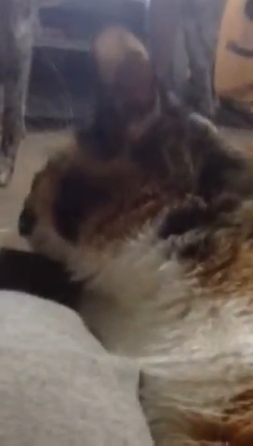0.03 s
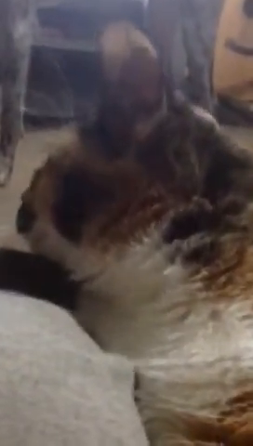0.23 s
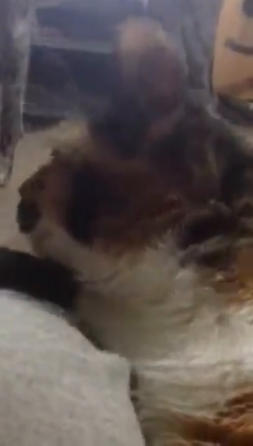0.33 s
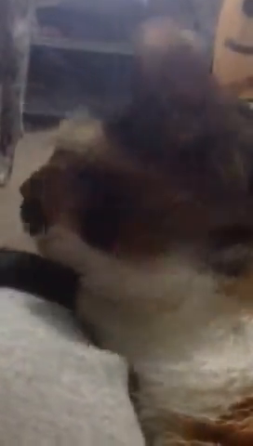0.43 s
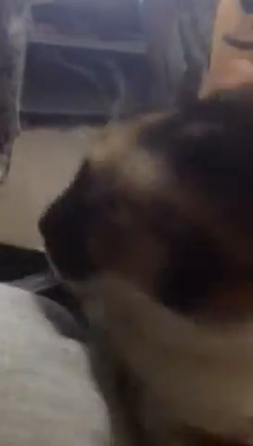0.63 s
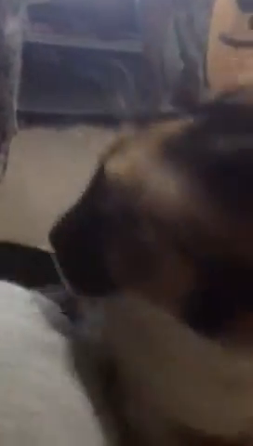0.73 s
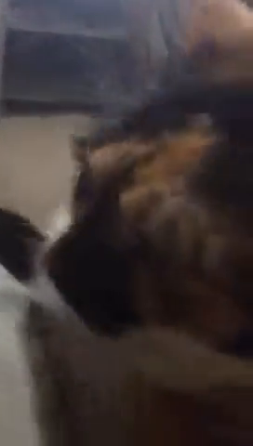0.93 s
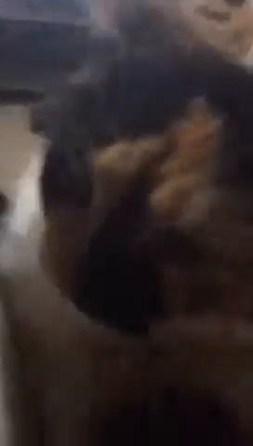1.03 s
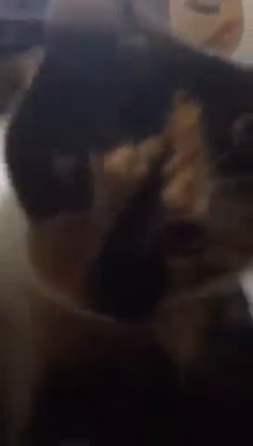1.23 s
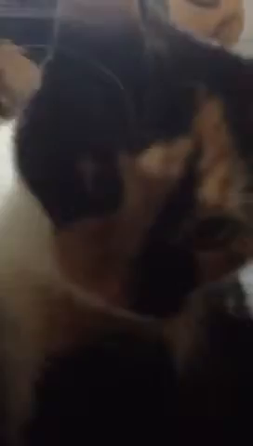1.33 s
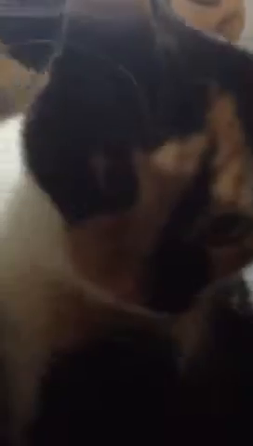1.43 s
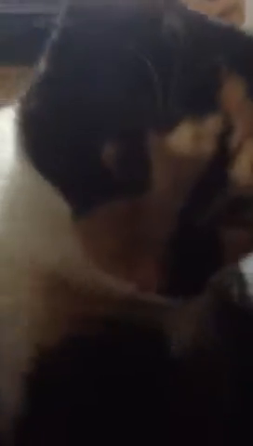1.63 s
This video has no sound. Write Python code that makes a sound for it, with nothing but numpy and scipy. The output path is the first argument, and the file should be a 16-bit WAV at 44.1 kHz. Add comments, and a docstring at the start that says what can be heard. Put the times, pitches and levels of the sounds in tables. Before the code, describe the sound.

A cat growls once, low and close to the microphone. The growl starts as a slow, uneven rattle, tightens into a louder, raspy buzz and ends in a short hum, over the faint hiss of a quiet room.

```python
"""Close cat growl.

A cat gives one long, low growl in a quiet, hissy room. Its vocal folds start as a slow uneven rattle,
speed up to a steadier buzz, slip into strong-weak pairs and end in a short closed-mouth hum.
The pulses ring the throat and mouth; puffs of air sound the nose and hiss faintly through the teeth."""
import sys
import numpy as np
from scipy import signal
from scipy.fft import rfft, irfft
from scipy.io import wavfile

SR = 44100
rng = np.random.default_rng(int(sys.argv[2]) if len(sys.argv) > 2 else 0)


def master_out(mix):
    """Clip the mix to full scale and print it as 16-bit PCM to the path in sys.argv[1]."""
    frames = np.transpose(np.atleast_2d(mix))
    ceiling = np.clip(frames, -1, 1)
    pcm = np.round(ceiling * 32767).astype(np.int16)
    wavfile.write(sys.argv[1], SR, pcm)


N = 74970
TIME_S = np.arange(N) / SR
HIGH_CUT_HZ = 15340


def amp(db):
    """Decibels to gain."""
    return 10 ** (np.asarray(db) / 20)


def curve(table, column=1):
    """One column of a time table, at every sample."""
    rows = np.array(table)
    return np.interp(TIME_S, rows[:, 0], rows[:, column])


def unit(x):
    """Scale to rms 1."""
    return x / np.sqrt(np.mean(x ** 2) + 1e-20)


def steady(x):
    """Scale to a running rms of 1."""
    window = np.hanning(2600)
    power = abs(signal.fftconvolve(x ** 2, window / window.sum(), "same"))
    return x / np.sqrt(power + 1e-14)


def jump(clicks):
    """Turn each click into a dip followed by a peak."""
    return signal.hilbert(clicks).imag


def colour(x, outline, causal=True):
    """Filter by a (freq_hz, gain_db) outline, causal or zero-phase."""
    hz, db = np.transpose(outline)
    bin_hz = abs(np.fft.fftfreq(N, 1 / SR)) + 1
    log_gain = np.log(amp(np.interp(np.log(bin_hz), np.log(hz), db)))
    if causal:
        log_gain = np.conj(signal.hilbert(log_gain))
    return np.fft.ifft(np.fft.fft(x) * np.exp(log_gain)).real


def band(x, low_hz, high_hz, order=10):
    """Zero-phase band-pass."""
    hz = np.fft.rfftfreq(N, 1 / SR) + 1e-3
    power_loss = (1 + (low_hz / hz) ** order) * (1 + (hz / high_hz) ** order)
    return irfft(rfft(x) / np.sqrt(power_loss), N)


def resonate(x, hz, width_hz):
    """Resonance at a constant or moving frequency."""
    carrier = np.exp(2j * np.pi * np.cumsum(hz * np.ones(N)) / SR)
    pole = np.exp(-np.pi * width_hz / SR)
    return 2 * (carrier * signal.lfilter([1 - pole], [1, -pole], x / carrier + 1e-18)).real


def cavity(x, hz, width_hz):
    """Two passes through one resonance, at a running rms of 1."""
    return steady(resonate(resonate(x, hz, width_hz), hz, width_hz))


def wobble(top_hz):
    """Random motion in the octave below top_hz, rms 1."""
    return unit(band(rng.standard_normal(N), top_hz / 2, top_hz, order=4))


# Room hiss spectrum: freq_hz, gain_db
HISS_SPECTRUM = [(180, -25.5), (300, -3.5), (331, -3.5), (390, 0), (430, -17), (459, -0.5), (738, -11),
                 (801, -8.5), (975, -15.5), (1060, -10), (1730, -11.5), (4050, -22.5), (4770, -22.5),
                 (9180, -38), (15000, -29.5)]
# Room rumble spectrum: freq_hz, gain_db
RUMBLE_SPECTRUM = [(30, -88), (85, -32), (105, -15), (122, -5.5), (160, -7), (250, -4.5), (330, -21),
                   (500, -39.5)]
# Room rumble envelope: time_s, level_db
RUMBLE_ENVELOPE = [(0, -61), (.13, -60.5), (1.48, -60.5), (1.63, -58.5), (1.7, -62.5)]

def background(hiss_db=-61, hum_hz=56.8, hum_db=-80.5):
    """Even hiss, low room rumble and a faint hum."""
    hiss = unit(band(colour(rng.standard_normal(N), HISS_SPECTRUM), 190, HIGH_CUT_HZ)) * amp(hiss_db)
    rumble = unit(colour(rng.standard_normal(N), RUMBLE_SPECTRUM)) * amp(curve(RUMBLE_ENVELOPE))
    hum = np.sqrt(2) * amp(hum_db) * np.sin(2 * np.pi * hum_hz * TIME_S)
    return hiss + rumble + hum


def room(x, t60_s=0.12, tail_db=-11.5, delay_s=.004):
    """Add the short, soft tail of a furnished room."""
    t = TIME_S[:SR // 3]
    tail = rng.standard_normal(len(t)) * amp(-60 * t / t60_s) * (t > delay_s)
    return x + amp(tail_db) * signal.fftconvolve(x, tail / np.linalg.norm(tail))[:N]


# Air hiss spectrum: freq_hz, gain_db
AIR_SPECTRUM = [(1000, -24), (2000, -13), (2400, -23), (2850, -10), (3400, -32), (4200, -2.5), (4720, -4.5),
                (5100, -24), (5800, -9), (6600, -5), (8000, -6), (10000, -16), (13000, -10), (15500, -13.5)]
# Air hiss envelope: time_s, level_db
AIR_ENVELOPE = [(.2, -80), (.4, -79), (.6, -75.5), (.87, -69.5), (1.02, -71), (1.1, -70), (1.33, -66.5),
                (1.38, -68.5), (1.42, -80)]

def air(puffs, pulsing=0.49, spit_per_s=60, spit_gain=7):
    """Air through the teeth and nose pulses with the folds and crackles with spit."""
    spit = spit_gain * rng.standard_normal(N) * (rng.random(N) < spit_per_s / SR)
    stream = pulsing * puffs + (1 - pulsing) * rng.standard_normal(N) + spit
    return unit(colour(stream, AIR_SPECTRUM)) * amp(curve(AIR_ENVELOPE))


# Nasal resonances: freq_hz, width_hz
NOSE_MODES = [(390, 132), (2870, 550), (4700, 290)]
# Nasal envelopes: time_s, murmur_db, lower_rasp_db, upper_rasp_db
NOSE_ENVELOPES = [(.2, -70, -94, -93), (.36, -53, -72, -78), (.55, -51.5, -87, -82.5),
                  (.75, -56.5, -84, -80.5), (.95, -43, -72.5, -73), (1.1, -63, -76, -73),
                  (1.32, -50, -80, -79), (1.4, -90, -90, -90)]

def nose(puffs):
    """Puffs sound the nasal passage: a low murmur and two thin, high rasps."""
    return sum(cavity(puffs, hz, width_hz) * amp(curve(NOSE_ENVELOPES, column))
               for column, (hz, width_hz) in enumerate(NOSE_MODES, start=1))


# Spectrum of the nearly closed mouth: freq_hz, gain_db
MOUTH_SPECTRUM = [(100, -37), (450, -19), (590, -5.5), (700, 3), (800, 0), (920, 1), (1030, -5.5),
                  (1250, -3.5), (1450, -10.5), (1700, -19.5), (2300, -22), (2850, -23), (3500, -44),
                  (8000, -74)]
# Jaw motion: time_s, resonance_hz, openness
JAW_MOTION = [(.25, 650, 0), (.5, 710, 0.2), (.75, 884, 0.15), (.95, 860, 0.1), (1.25, 856, 0.1),
              (1.38, 840, 0)]

def mouth(snap, puffs, width_hz=320, rasp_shut=.85, rasp_open=.05):
    """Pressure jumps ring the mouth: dull and raspy with the jaw shut, crisper as it opens."""
    openness = curve(JAW_MOTION, column=2)
    rasp = rasp_shut + (rasp_open - rasp_shut) * openness
    crisp = colour(rasp * puffs + unit(jump(snap)), MOUTH_SPECTRUM, causal=False)
    dull = resonate(crisp, curve(JAW_MOTION), width_hz)
    return steady(openness * crisp + (1 - openness) * dull)


# Main throat resonance: time_s, freq_hz
THROAT_RESONANCE = [(.2, 191), (.33, 230), (.45, 288), (.58, 312), (.7, 373), (.9, 358), (1.15, 354),
                    (1.25, 367), (1.33, 307), (1.4, 262)]

def throat(push, puffs, swell_ratio=0.96, ring_gain_db=-2.5, chest_gain_db=-13):
    """Each pulse rings a moving throat resonance; turbulent puffs rumble in the chest."""
    hz = curve(THROAT_RESONANCE)
    # Filtered backwards, so the flow swells before each closure.
    flow = resonate(jump(push)[::-1], swell_ratio * hz[::-1], width_hz=300)[::-1]
    ring = resonate(flow, hz, width_hz=250)
    ring = steady(band(ring, low_hz=112, high_hz=515, order=16))
    chest = cavity(puffs, hz=202.4, width_hz=80)
    return amp(ring_gain_db) * ring + amp(chest_gain_db) * chest


# Clean partials of the folds: time_s, fundamental_gain_db, second_gain_db, third_gain_db
PARTIAL_ENVELOPES = [(.2, -76, -68, -68), (.27, -74, -56, -53), (.33, -72, -50.5, -52.5),
                     (.39, -70, -51, -60), (.46, -66, -44.5, -60), (.53, -64, -50, -55),
                     (.63, -62, -53, -50), (.7, -59, -52, -48.5), (.85, -58, -50, -52),
                     (.92, -57, -50, -52), (1.0, -59, -49, -48), (1.1, -59, -47, -45),
                     (1.21, -59, -48.5, -42.5), (1.27, -60, -47, -48), (1.335, -64, -40, -55),
                     (1.368, -68, -35, -64), (1.388, -74, -42, -72), (1.4, -80, -56, -78),
                     (1.44, -85, -56, -85)]

def fold_tone(cycles, gain_db=-2.5, flutter_db=1.2):
    """Three harmonics locked to the folds; their level flutters."""
    flutter = amp(flutter_db * wobble(top_hz=40))
    partials = sum(amp(curve(PARTIAL_ENVELOPES, k)) * np.sin(2 * np.pi * k * cycles) for k in (1, 2, 3))
    return np.sqrt(2) * amp(gain_db) * flutter * partials


# Pulse rate of the folds: time_s, pitch_hz
FOLD_PITCH = [(.2, 63), (.26, 66), (.31, 75), (.36, 79), (.41, 96), (.46, 105), (.53, 119), (.6, 130),
              (.655, 133), (.698, 151), (.745, 139), (.79, 137), (.87, 149), (.9, 150), (.92, 139),
              (.94, 155), (.978, 128), (1.02, 136), (1.062, 143), (1.088, 132), (1.15, 131.5), (1.19, 135),
              (1.245, 126), (1.3, 126), (1.335, 111), (1.362, 124), (1.395, 118), (1.43, 119)]
# Pulse unevenness: time_s, scatter_cycles, alternate_weakening
FOLD_ROUGHNESS = [(.2, .06, .15), (.33, .035, .1), (.42, .05, .2), (.5, .07, .25), (.62, .04, .33),
                  (.68, .03, .25), (.75, .018, .08), (.85, .025, .15), (.91, .03, .4), (.97, .022, .15),
                  (1.035, .022, .4), (1.09, .014, .14), (1.22, .018, .15), (1.26, .03, .45),
                  (1.315, .035, .42), (1.35, .025, .15)]
# Single hard closures as the rattle catches: start_s, snap_gain_db
HARD_CLOSURES = [(.491, -2), (.532, 3), (0.589, 8), (0.672, 5)]
WAVER_CYCLES, PUSH_SHIMMER_DB, SNAP_SHIMMER_DB = .012, .8, 1
WEAK_SPREAD, LAG_CYCLES_PER_WEAKENING = 0.16, 0.12
REBOUND_GAIN, REBOUND_SCATTER_CYCLES, REBOUND_BELOW_HZ = .5, .05, 108

def folds():
    """Uneven closures, every second one weaker and later: throat push, mouth snap, cycle count."""
    turns = np.cumsum(curve(FOLD_PITCH)) / SR + WAVER_CYCLES * wobble(top_hz=16)
    at = np.flatnonzero(np.diff(np.floor(turns)))
    period_samples = SR / curve(FOLD_PITCH)[at]
    scatter, size, sharpness, slip, bounce = rng.standard_normal((len(at), 5)).T
    alternate = np.arange(len(at)) % 2
    weakening = alternate * np.clip(curve(FOLD_ROUGHNESS, 2)[at] * (1 + WEAK_SPREAD * slip), 0, .9)
    strength = (1 - weakening) * amp(PUSH_SHIMMER_DB * size)
    crispness = strength * (1 - weakening) * amp(SNAP_SHIMMER_DB * sharpness)
    shift_cycles = scatter * curve(FOLD_ROUGHNESS)[at] + LAG_CYCLES_PER_WEAKENING * weakening
    at = np.clip(at + shift_cycles * period_samples, 0, N - 1).astype(int)
    cycles = np.interp(np.arange(N), at, np.arange(len(at)))
    for start_s, snap_gain_db in HARD_CLOSURES:
        nearest = np.argmin(abs(at - start_s * SR))
        at[nearest], crispness[nearest] = round(start_s * SR), amp(snap_gain_db)
    push, snap = np.zeros((2, N))
    # Slack, slow folds touch again in mid-cycle.
    rebound_cycles = .5 + REBOUND_SCATTER_CYCLES * bounce
    rebound_at = np.clip(at + rebound_cycles * period_samples, 0, N - 1).astype(int)
    push[rebound_at] = REBOUND_GAIN * strength * (period_samples > SR / REBOUND_BELOW_HZ)
    push[at], snap[at] = strength, crispness
    return push, snap, cycles


# Vocal effort: time_s, throat_gain_db, mouth_gain_db
VOCAL_EFFORT = [(.2, -52, -87), (.225, -50.5, -78), (.27, -53.5, -65.5), (.36, -46.5, -57),
                (.44, -46, -56.5), (.56, -49.5, -53.5), (.63, -48, -52.5), (.7, -47.5, -49.5),
                (.78, -46, -48), (.87, -48, -48.5), (.915, -45.5, -45), (.97, -45.5, -45.5),
                (1.04, -44, -46), (1.11, -42.5, -44.5), (1.22, -40, -46.5), (1.27, -40.5, -47.5),
                (1.33, -39.5, -50), (1.362, -46, -55), (1.385, -81, -69), (1.43, -93, -99)]

def growl(start_s=.195, end_s=1.445, fade_s=.012, puff_decay_cycles=0.39):
    """Fold closures and one puff of air per cycle drive the throat, mouth and nose."""
    push, snap, cycles = folds()
    puffs = unit(np.exp(-(cycles % 1) / puff_decay_cycles) * rng.standard_normal(N))
    body = throat(push, puffs) * amp(curve(VOCAL_EFFORT, column=1))
    rattle = mouth(snap, puffs) * amp(curve(VOCAL_EFFORT, column=2))
    voice = fold_tone(cycles) + body + rattle + nose(puffs) + air(puffs)
    return voice * np.clip(np.minimum(TIME_S - start_s, end_s - TIME_S) / fade_s, 0, 1)


def scene():
    """The cat in its room, through the microphone's low cut, over the background; mono."""
    cat = band(room(growl()), low_hz=120, high_hz=HIGH_CUT_HZ, order=16)
    return (cat + background())[None]


def record(dry):
    """Steep low-pass at the band limit."""
    low_pass = signal.firwin(801, HIGH_CUT_HZ, window=("kaiser", 9), fs=SR)
    return signal.oaconvolve(dry, low_pass[None], "same")


dry = scene()
out = record(dry)
master_out(out)
```